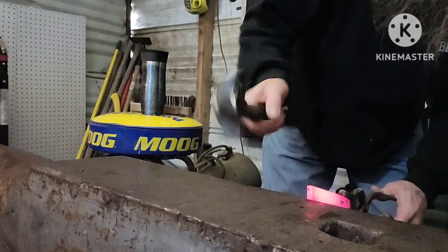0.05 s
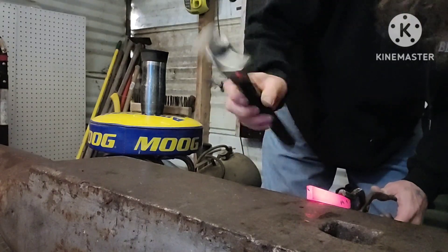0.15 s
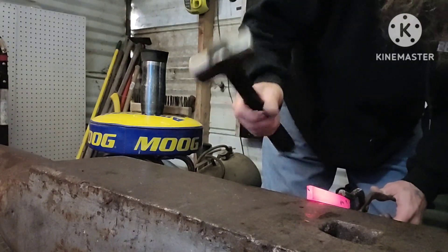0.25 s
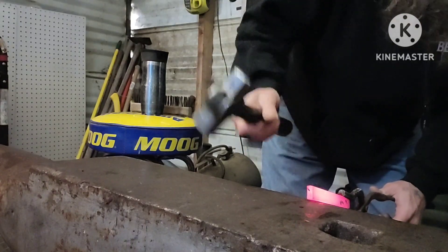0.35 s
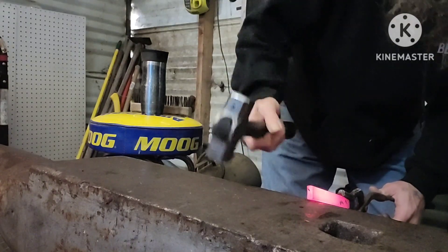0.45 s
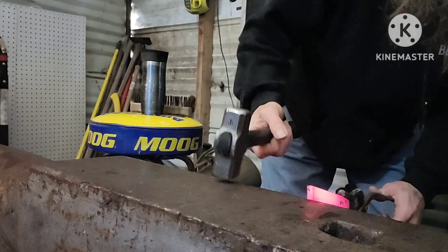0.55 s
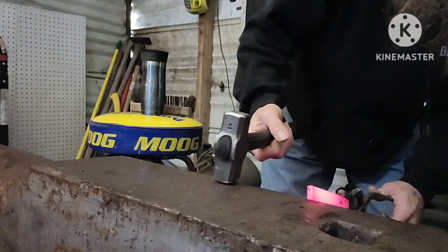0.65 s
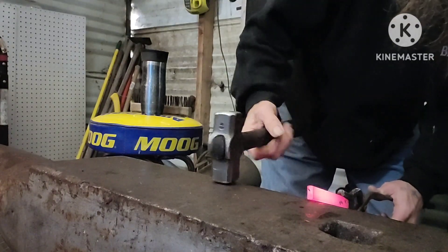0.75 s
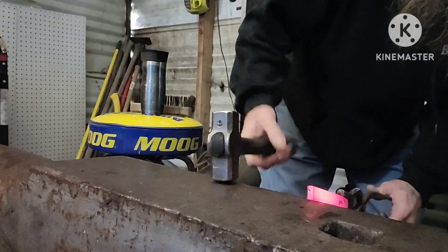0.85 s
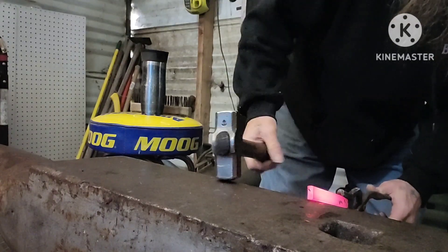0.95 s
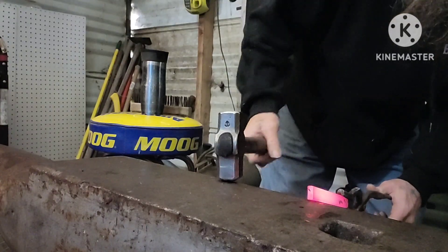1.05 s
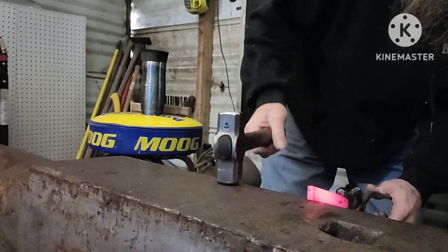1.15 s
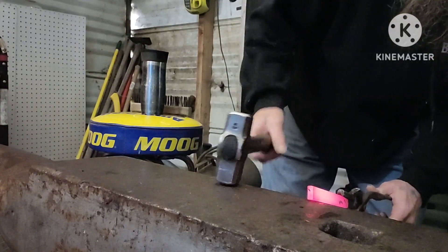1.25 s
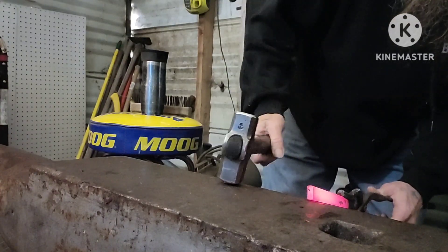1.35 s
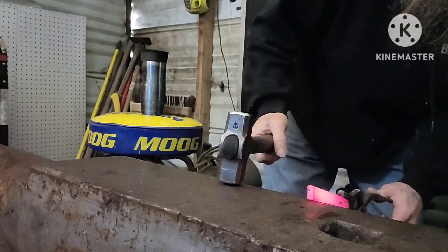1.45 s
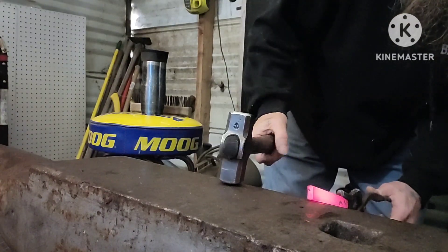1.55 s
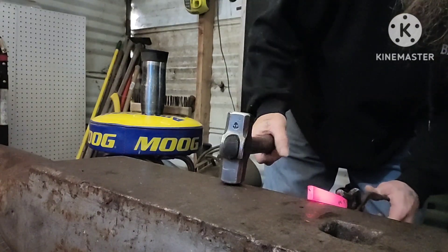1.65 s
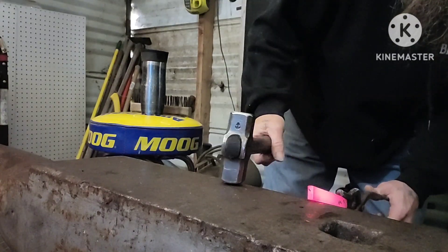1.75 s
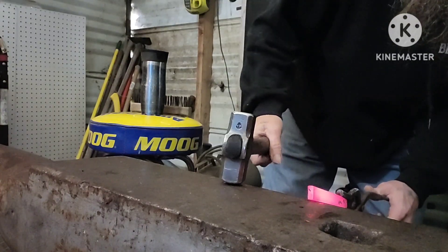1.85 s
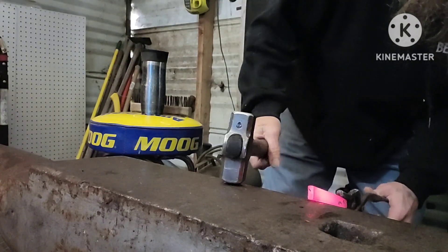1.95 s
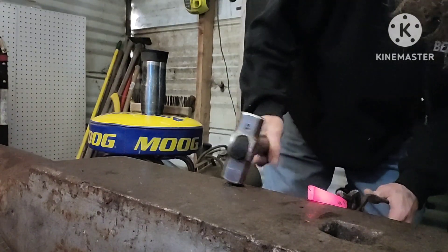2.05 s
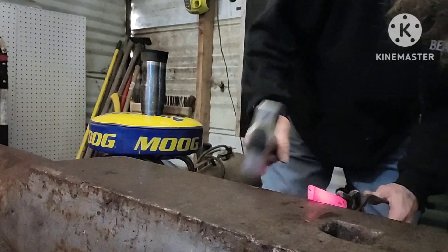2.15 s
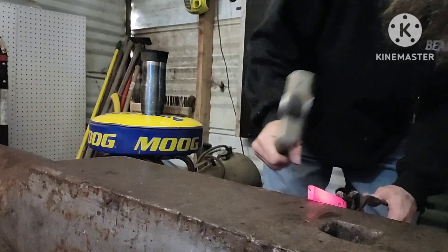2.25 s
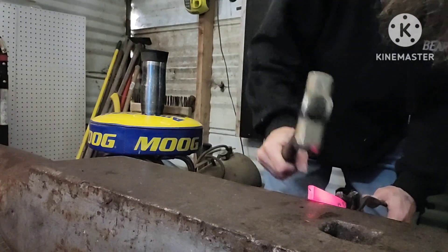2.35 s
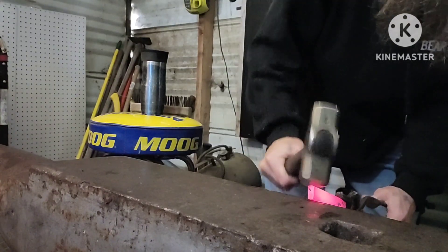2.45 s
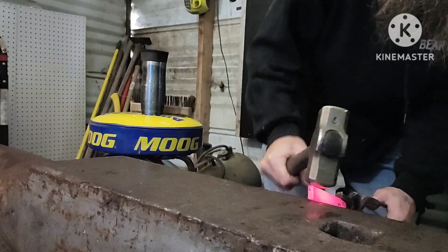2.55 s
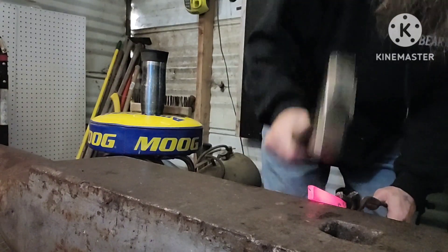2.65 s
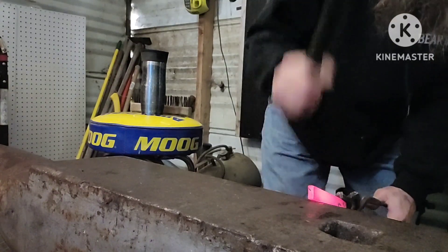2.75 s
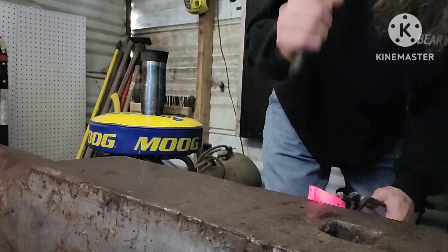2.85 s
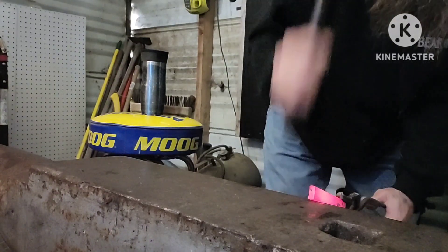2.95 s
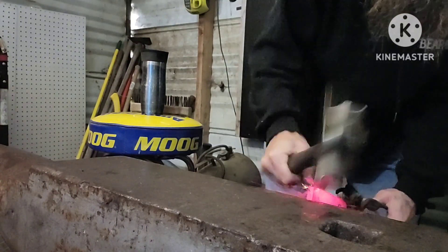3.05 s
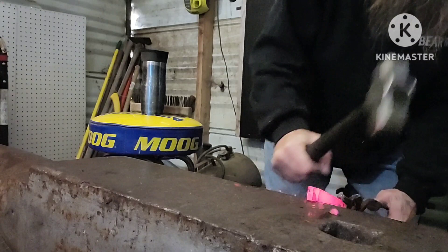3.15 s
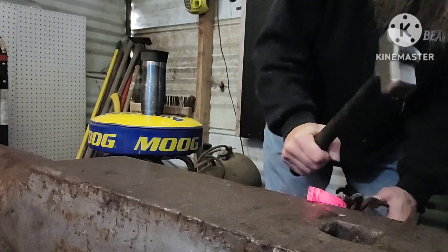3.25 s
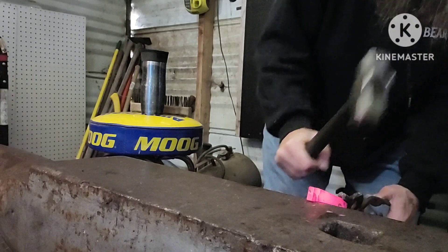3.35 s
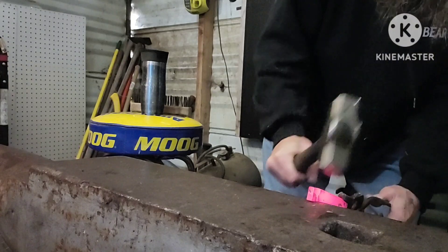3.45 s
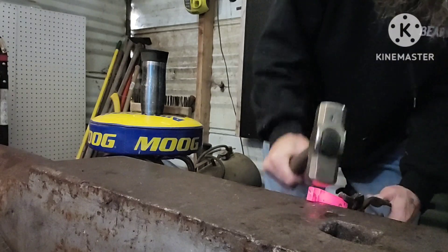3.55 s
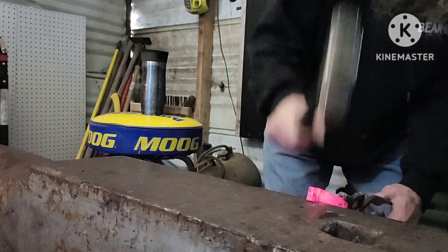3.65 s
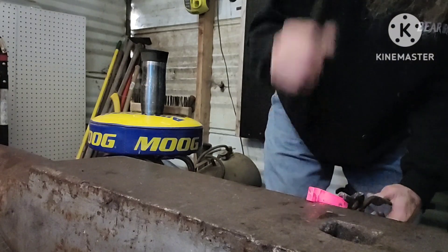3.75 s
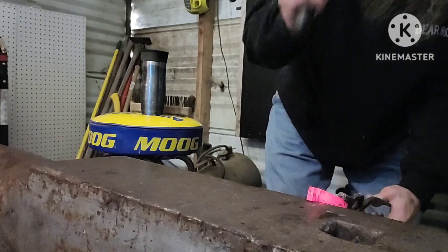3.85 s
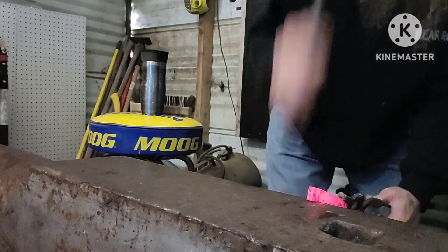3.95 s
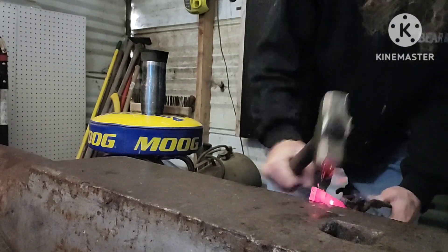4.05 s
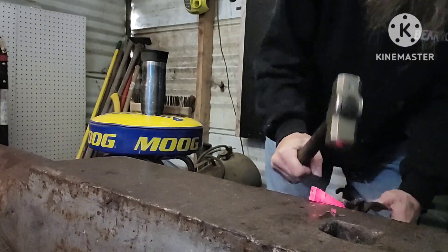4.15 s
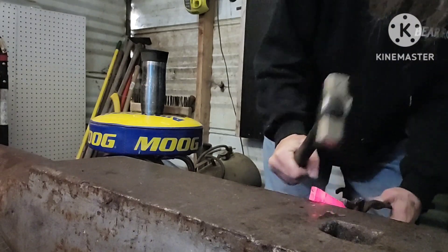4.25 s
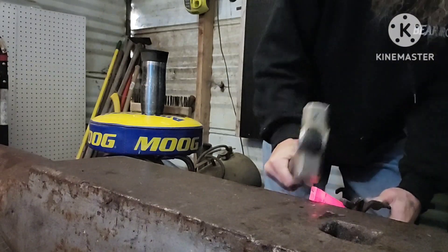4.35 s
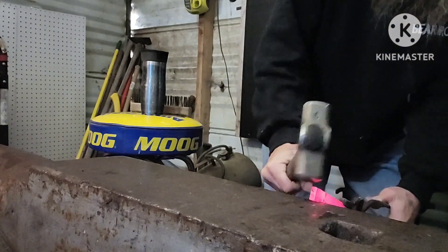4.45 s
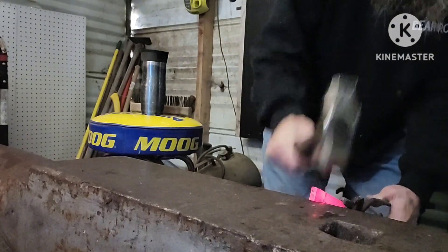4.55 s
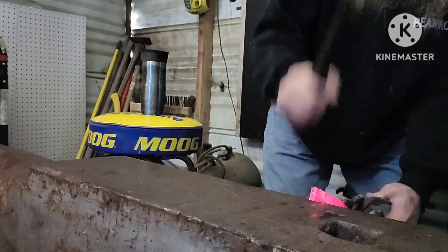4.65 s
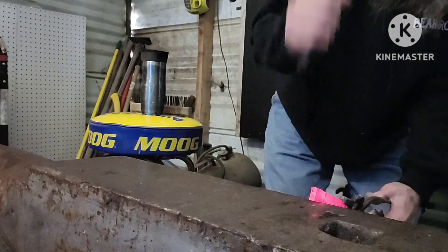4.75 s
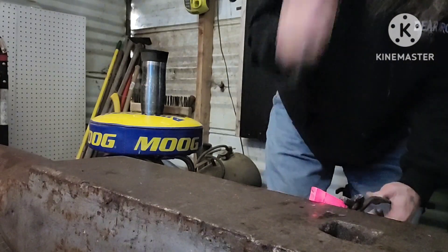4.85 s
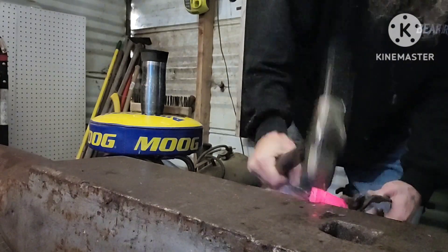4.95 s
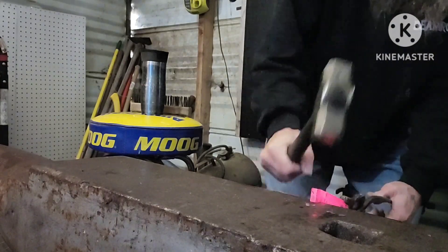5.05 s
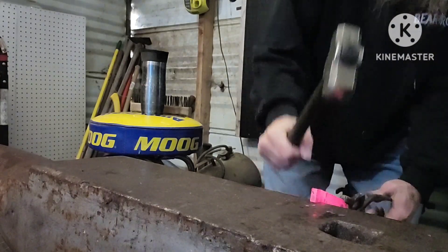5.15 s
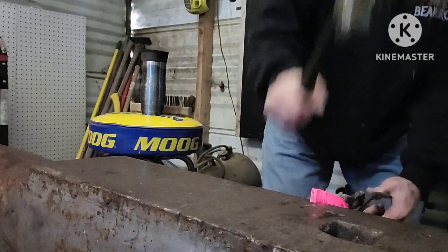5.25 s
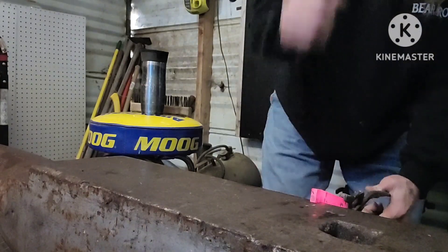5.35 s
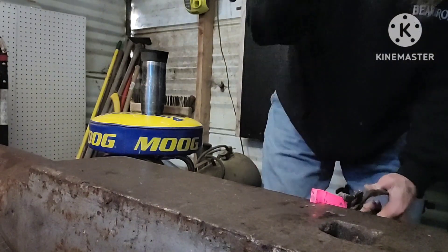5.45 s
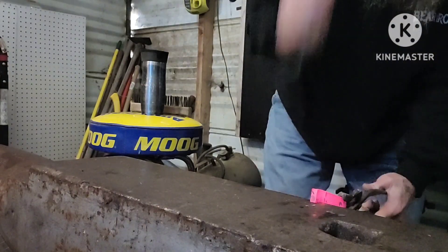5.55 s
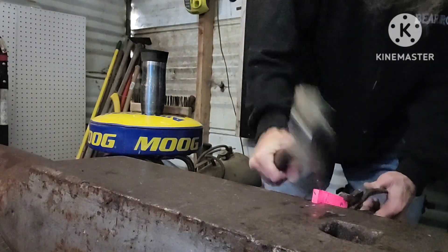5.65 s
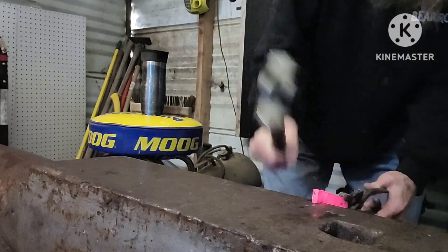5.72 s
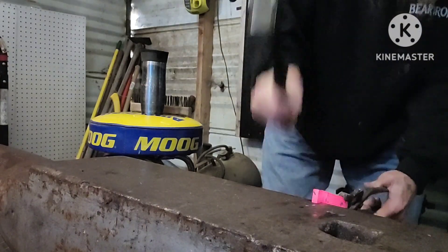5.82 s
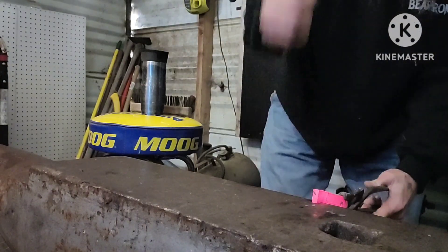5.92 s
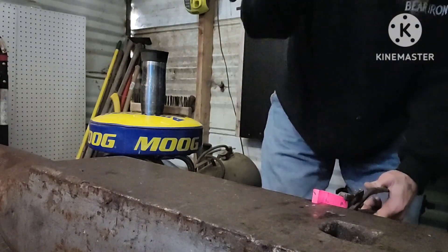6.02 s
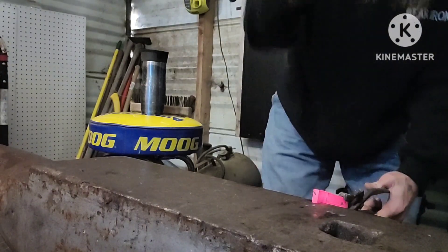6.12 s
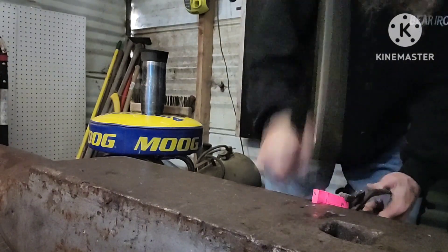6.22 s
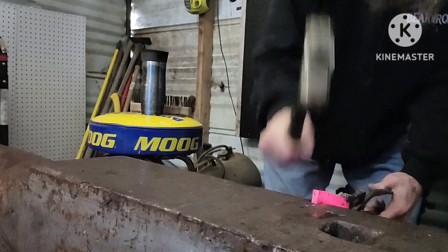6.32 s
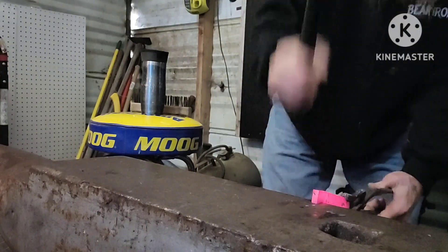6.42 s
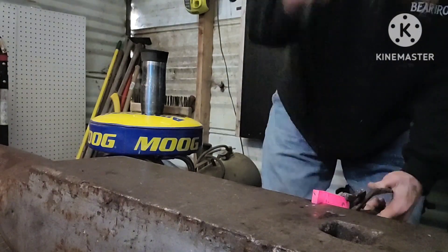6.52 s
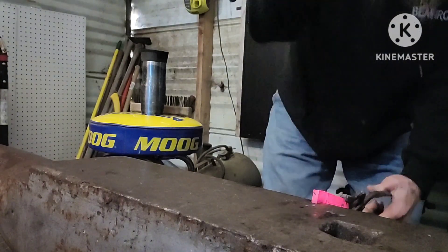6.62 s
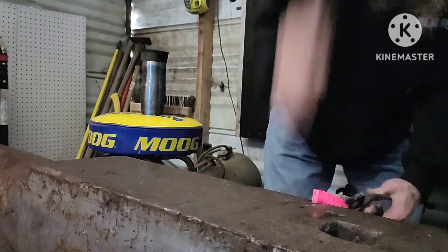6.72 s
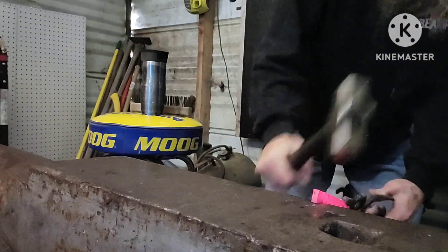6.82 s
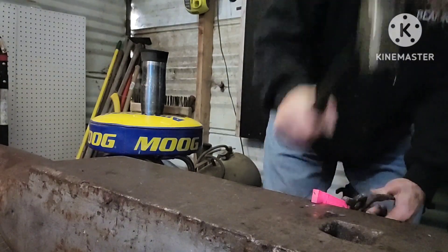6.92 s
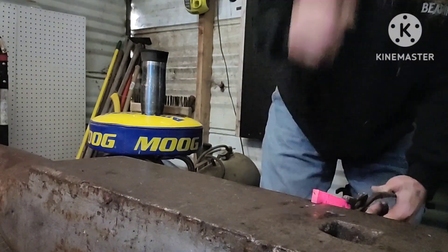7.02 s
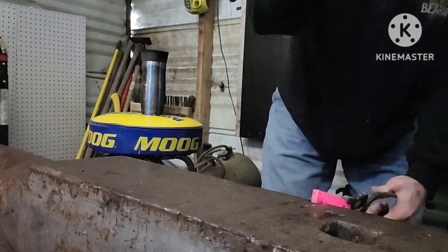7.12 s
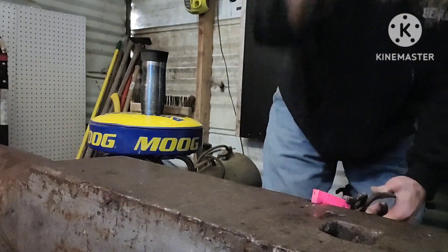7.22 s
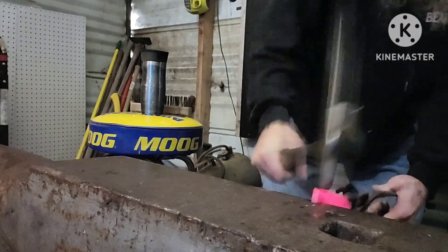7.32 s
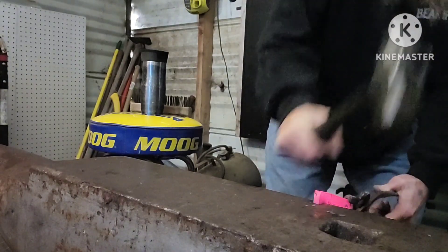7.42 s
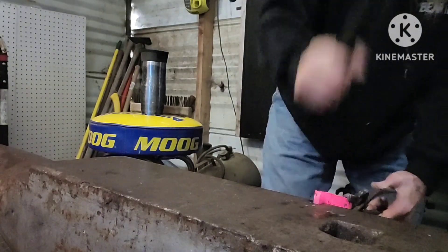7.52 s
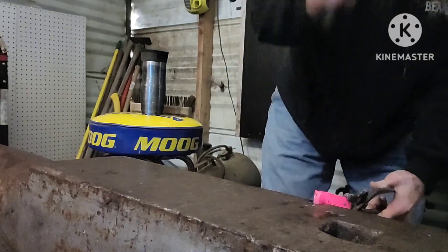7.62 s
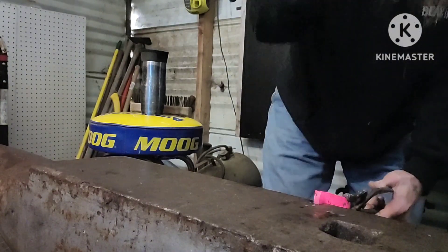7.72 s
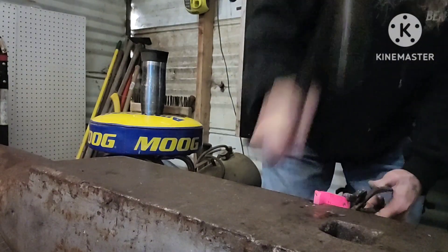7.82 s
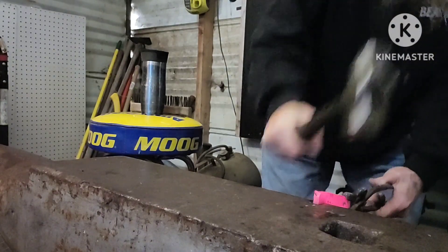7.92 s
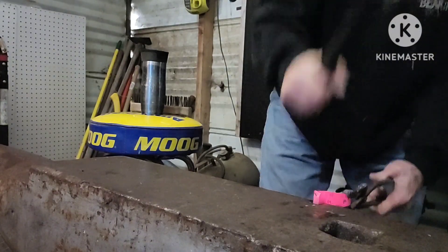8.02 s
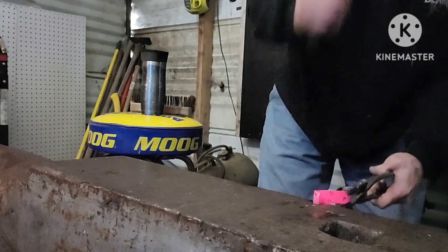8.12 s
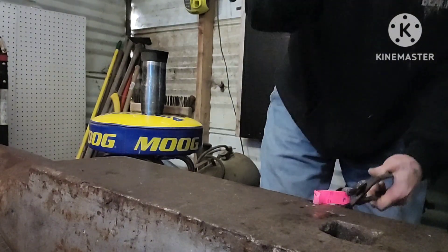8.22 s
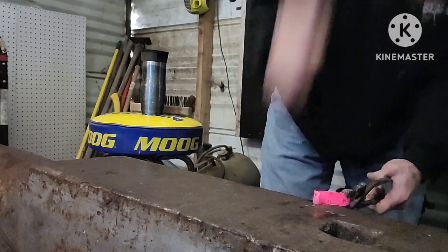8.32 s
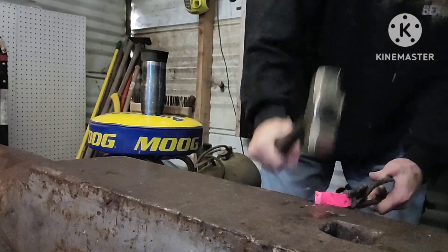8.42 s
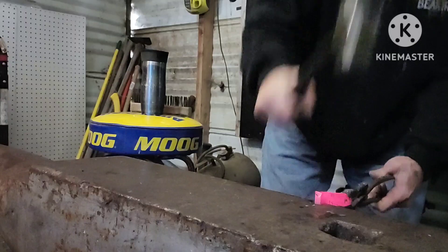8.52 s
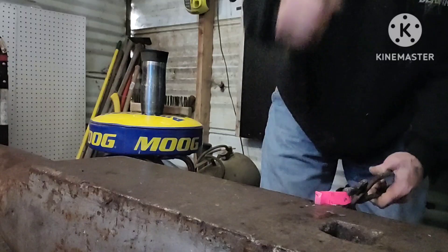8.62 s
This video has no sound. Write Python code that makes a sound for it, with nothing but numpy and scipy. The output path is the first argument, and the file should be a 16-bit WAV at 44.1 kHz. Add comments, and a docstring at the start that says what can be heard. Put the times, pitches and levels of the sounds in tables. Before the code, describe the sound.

In a small shed, a soft airy hiss and low rumble run alone for about two and a half seconds, then a faint metallic tap. Nine hard hammer blows on a hot bar over an anvil follow, about a second apart at first, then roughly every half second. Each is a sharp crack with a brief steely ring and low thump. Close stereo pickup, short wall reflections.

```python
"""In a small shed, before two microphones, a smith flattens a glowing bar on an anvil: nine blows, four light taps.
Each blow is a short swell, a noise crack and crush coloured by damped steel modes, then tones and wall reflections.
Low sines make the thump of the anvil stand; a tap is the same contact, quieter and recoloured, plus one clear ping.
Behind it lie a soft hiss of shaped noise that swells and sinks, a faint steady fizz and a low rumble."""
import sys
import numpy as np
from scipy import signal
from scipy.fft import rfft, irfft, next_fast_len
from scipy.io import wavfile

SR = 44100
rng = np.random.default_rng(int(sys.argv[2]) if len(sys.argv) > 2 else 0)


def unload_wav(signal):
    """Save mono or channel-first audio to the path in sys.argv[1] as 16-bit WAV at rate SR, clipped to [-1, 1]."""
    wavfile.write(
        sys.argv[1],
        SR,
        np.round(np.clip(np.atleast_2d(signal).T, -1, 1) * 32767).astype(np.int16),
    )


N = 382788
LIFE = SR // 2  # samples that one hit lasts

# Hammer on the hot bar. Each row: start in seconds, clank level in dB, then knock, body, ting and sizzle
# (low to high bands of the clank) in dB, thump level in dB, snap in dB (counted twice in the crush),
# left over right in dB, lead-in swell in dB, dip of the hiss after the blow in dB (negative: a rise).
HAMMER_BLOWS = [(3.1017, -18.5, 1.5, 3.5, 1.5, -2, -31.5, 6.5, 0, -4, 1),
                (4.077, -18, 0.5, 4, 3.5, 2, -33.5, 5.5, -0.5, -2, 5),
                (5.0038, -18.5, -4.5, 0, -3, -5.5, -36, 5.5, -1.5, -0.5, 1.5),
                (5.6933, -21, -8, -2, -1.5, -2.5, -35.5, 0, -1.5, 6.5, 3),
                (6.288, -20.5, -9, -5, -3.5, -13, -36.5, 1, -.5, 3.5, -0.5),
                (6.83, -22, -4, -0.8, -0.5, 2.5, -38, -2.5, -1.5, 2, 2.5),
                (7.3721, -19, -4, 0, -1.5, -2, -36, 8, -1.5, -6.5, 2.5),
                (7.8983, -21, -4, -5.5, -1.5, -5.5, -36.5, 4.5, -2.5, 4, 3),
                (8.433, -19.5, -7.5, -4, -1.5, -4.5, -37, 4.5, -.5, 1.5, 2)]


def blows(swell_db=-1, swell_t60=0.052):
    """Each blow excites the steel differently: fuller or thinner, with more or less ting and sizzle."""
    out = np.zeros((2, N))
    lead = SR // 25
    before_crack = np.arange(lead)[::-1] / SR  # seconds left until the crack
    for (s, clank_db, knock_db, body_db, ting_db, sizzle_db,
         thump_db, snap_db, pan_db, rise_db, _) in HAMMER_BLOWS:
        shade = [(350, knock_db), (600, body_db), (1300, body_db), (1800, 0), (3000, 0),
                 (4200, ting_db), (8000, ting_db), (13000, sizzle_db / 2)]  # Hz, dB
        metal = steel()
        colour = lambda hz: metal(hz) * amp(along(shade, hz))

        # the sound swells in over the last few milliseconds before the crack
        lead_in = [(200, 16.4), (1000, 2.3), (2200, 11.6), (15000, 6.5)]  # Hz, dB
        lead_colour = lambda hz: colour(hz) * amp(along(lead_in, hz))
        swell = unit(filtered(diffuse(lead), lead_colour)) * amp([[2], [-2]])
        swell = swell * amp(swell_db + rise_db - 60 * before_crack / swell_t60)

        gain = amp(clank_db + np.array([[pan_db], [-pan_db]]) / 2)
        add(out, s - lead / SR, gain * swell)
        add(out, s, gain * contact(colour, snap_db, sizzle_db))
        add(out, s, amp(thump_db) * stand())

    # left over right (Hz, dB): the body of the clank leans right, the sizzle left
    lean_points = [(100, -0.5), (600, -0.5), (1200, -2.0), (2300, 1.5), (4500, -2.5), (9000, 4), (14000, 2.0)]
    lean = lambda hz: along(lean_points, hz)
    return filtered(out, lambda hz: amp(np.array([lean(hz), -lean(hz)]) / 2))


def contact(colour, snap_db, sizzle_db, crush_db=-10, crush_t60=0.13, build=0.0061, chime_db=-7):
    """A sharp crack and the crush of metal and scale, then the ringing steel and the walls' answer."""
    t = np.arange(LIFE) / SR
    crack_db, crack_t60 = -5.5, .0025
    crush_db = crush_db + 2 * snap_db
    crack = amp(crack_db) * burst(diffuse(LIFE) * amp(-60 * t / crack_t60))
    crush = amp(crush_db) * burst(diffuse(LIFE) * amp(-60 * t / crush_t60))

    # the highest tones reach the microphone mostly by the direct path
    aim = [(200, -3), (1000, -3), (4000, 2), (9000, -3), (15000, 6 + sizzle_db)]  # Hz, dB
    direct = burst(rung(crack + crush, lambda hz: colour(hz) * amp(along(aim, hz))))
    strength = np.hypot(amp(crack_db), amp(crush_db))

    duller = lambda hz: colour(hz) * amp(along([(13000, 0), (14800, -3)], hz))
    tail = burst(shed(duller)) + amp(chime_db) * chime(duller)
    tail = tail * (1 - np.exp(-t / build))  # the answer builds up over milliseconds
    return burst(strength * direct + burst(tail))


# Broad colour of a hard blow. Each row: frequency in Hz, level in dB.
STEEL_COLOUR = [(30, -6), (150, -9.5), (330, -5.5), (480, -6), (850, -6), (1150, 1), (1600, -5.5),
                (2300, -5), (3400, -8.5), (4500, -8), (6500, -7), (8700, -18), (12000, -16), (15200, -12)]
# Modes of anvil, hammer and tongs. Each row: frequency in Hz, width in Hz,
# height in dB against the broad colour (added to it as power).
STEEL_MODES = [(199, 11, 8.5), (275, 8, 7), (527, 30, 3), (564, 14, 9), (683, 10, 12), (735, 33, 4),
               (970, 10, 10), (1110, 17, 2), (1146, 30, 10), (1203, 16, 8), (1268, 14, 8), (2002, 44, 10),
               (2068, 11, 9), (2215, 43, 10), (2347, 34, 6), (2539, 18, 6), (2755, 63, 7), (2870, 65, 2),
               (2970, 67, 4), (3292, 7, 3), (3737, 7, 7), (3876, 36, 11), (4255, 78, 7), (5022, 22, 12),
               (8123, 10, 7), (9660, 97, 6), (10835, 36, 9), (14860, 68, 13)]


def steel(scatter_db=1.5):
    """Colour of one blow: damped modes on a broad base, in a mix that varies at random from blow to blow."""
    hz = np.fft.rfftfreq(LIFE, 1 / SR)
    centre, width, db = np.transpose(STEEL_MODES)[:, :, None]
    height = amp(db + scatter_db * rng.standard_normal(db.shape))
    peaks = np.sum(height ** 2 / (1 + (2 * (hz - centre) / width) ** 2), axis=0)
    gain = amp(along(STEEL_COLOUR, hz)) * np.sqrt(1 + peaks)
    return lambda f: np.interp(f, hz, gain)


def chime(colour, ring_t60=0.11, scatter_db=3, drift=0.0066):
    """The steel's modes ring on as clear tones at uneven strengths, and the highest die first."""
    t = np.arange(LIFE * 2 // 3) / SR
    hz = np.array(STEEL_MODES)[:, :1] * (1 + drift * rng.standard_normal((len(STEEL_MODES), 1)))
    size = colour(hz) * amp(scatter_db * rng.standard_normal(hz.shape))
    fade = amp(-60 * t * (1 + hz / 40000) / ring_t60)
    # long waves reach both microphones nearly in step
    apart = np.minimum(hz / 1300, np.pi) * rng.standard_normal((2, len(hz), 1))
    phase = rng.uniform(0, 2 * np.pi, hz.shape) + apart
    tones = np.sum(size * fade * np.sin(2 * np.pi * hz * t + phase), axis=1)
    return burst(np.pad(tones, [(0, 0), (0, LIFE - len(t))]))


# Echo of the shed. Each row: frequency in Hz, time to fall 60 dB in seconds.
SHED_DECAY = [(80, 1), (250, 0.26), (600, 0.23), (1200, 0.24), (2600, 0.29), (6000, 0.25), (15000, 0.29)]


def shed(colour):
    """Dense reflections of a coloured sound; each frequency dies at its own speed."""
    hz, t, z = signal.stft(filtered(diffuse(LIFE), colour), SR, nperseg=256)
    fade = amp(-60 * t / along(SHED_DECAY, hz)[:, None])
    return signal.istft(z * fade, SR, nperseg=256)[1][:, :LIFE]


# Stand and floor. Each row: frequency in Hz, level in dB, time to fall 60 dB in seconds.
STAND_MODES = [(62, -19, .8), (77.5, -4, .6), (84.5, -3, .45), (93, -5, .25), (108, -3.5, .25),
               (120, -1, .22), (134, -2.5, .22)]


def stand(rise=0.011, spread=0.18):
    """The anvil rocks on its stand and shakes the floor; close modes beat into a second throb."""
    t = np.arange(LIFE) / SR
    ring = 0
    for hz, db, t60 in STAND_MODES:
        phase = spread * rng.normal() * np.array([[1], [-1]])
        size = amp(db + rng.normal(0, 1) - 60 * t / t60)
        ring = ring + size * np.sin(2 * np.pi * hz * t + phase)
    return burst(ring * (1 - np.exp(-t / rise))) * amp([[-.8], [.8]])


# The hammer resting or bouncing lightly. Each row: start in seconds, tink level in dB, thump level in dB.
LIGHT_TAPS = [(2.519, -48.5, -48.5), (3.583, -39, -52), (3.597, -50.5, -64), (6.748, -65, -52)]
# Colour of a tap, laid over the colour of the steel. Each row: frequency in Hz, level in dB.
TAP_COLOUR = [(200, -2), (450, 2), (900, -13), (1220, -0.5), (1500, -7), (2200, -15), (2900, -9),
              (4000, -31), (6300, -5), (10000, -15), (15000, -17)]
# the anvil tone that stands out in a light tap; its level is against the tink
PING_HZ, PING_T60, PING_DB = 1187, 0.14, -7


def taps():
    """A light contact: a recoloured clank, one decaying anvil tone and a faint thump of the stand."""
    out = np.zeros((2, N))
    t = np.arange(LIFE) / SR
    ping = amp(PING_DB) * burst(np.sin(2 * np.pi * PING_HZ * t) * amp(-60 * t / PING_T60))
    for s, tink_db, thump_db in LIGHT_TAPS:
        metal = steel()
        colour = lambda hz: metal(hz) * amp(along(TAP_COLOUR, hz))
        tink = contact(colour, snap_db=12.0, sizzle_db=-4)
        add(out, s, amp(tink_db) * (tink + ping))
        add(out, s, amp(thump_db) * stand())
    return out


# Colour of the hiss. Each row: frequency in Hz, level in dB.
HISS_COLOUR = [(100, -14), (280, -4), (700, 0), (1500, -.5), (3000, -1), (5600, -4), (7100, -8),
               (8300, -18), (12000, -17), (15500, -15.5)]
# Colour of the rumble. Each row: frequency in Hz, level in dB.
RUMBLE_COLOUR = [(20, -15), (40, -8), (76, 0), (105, -5), (135, -6), (165, -13), (200, -9), (400, -22),
                 (1000, -45)]
FIZZ_DB, FIZZ_HZ = -63.5, 7000  # a faint steady treble under the hiss: level, lower edge
RUMBLE_DB, RUMBLE_FOLLOWS = -56.5, 0.23  # mean level of the rumble; its dB for each dB of the hiss


def background(hiss_db=3):
    """Shaped noise: a soft hiss and a steady fizz over the shed's low rumble, which rises a little with the hiss."""
    hiss = unit(filtered(diffuse(N), lambda hz: amp(along(HISS_COLOUR, hz))))
    fizz = unit(filtered(diffuse(N), lambda hz: hz > FIZZ_HZ))
    rumble = unit(filtered(diffuse(N), lambda hz: amp(along(RUMBLE_COLOUR, hz))))
    db = hiss_level()
    rumble_db = RUMBLE_DB + RUMBLE_FOLLOWS * (db - db.mean())
    return hiss * amp(db + hiss_db) + fizz * amp(FIZZ_DB) + rumble * amp(rumble_db)


# Slow course of the hiss. Each row: time in seconds, level in dB before the lift in background().
HISS_COURSE = [(0.0, -48.5), (2.03, -40.5), (6.21, -51.5), (7.69, -48.5), (8.68, -54)]
# Brief swells of the hiss. Each row: time of the top in seconds, rise in dB,
# seconds from the top until the rise has shrunk to 1/e.
HISS_SWELLS = [(0.248, 4, 0.043), (.61, 5, 0.099), (4.734, 4.5, .04), (5.26, 3.5, 0.11), (5.58, 2.5, 0.083),
               (7.72, 2, 0.14), (8.343, 4, .025)]
DIP_FALL_S, DIP_RECOVER_S = 0.2, 0.51  # after most blows the hiss sinks, then comes back


def hiss_level():
    """The slow level in dB, with dips after the blows and a few brief swells."""
    t = np.arange(N) / SR
    dip_times = [0, DIP_FALL_S, DIP_FALL_S + DIP_RECOVER_S]
    dips = sum(np.interp(t - s, dip_times, [0, dip_db, 0]) for s, *_, dip_db in HAMMER_BLOWS)
    swells = sum(rise_db * np.exp(-((t - s) / half) ** 2) for s, rise_db, half in HISS_SWELLS)
    return level(HISS_COURSE) - dips + swells


# Likeness of the two microphones. Each row: frequency in Hz, left-right correlation from 0 to 1.
STEREO_LIKENESS = [(60, 0.92), (130, 0.9), (290, 0.91), (640, 0.24), (1400, 0.03), (15000, 0)]


def diffuse(size):
    """Stereo noise: alike in the bass, unrelated in the treble."""
    turn = lambda hz: np.arccos(np.clip(along(STEREO_LIKENESS, hz), -1, 1)) / 2
    shares = lambda hz: np.array([np.cos(turn(hz)), np.sin(turn(hz))])
    mid, side = filtered(rng.standard_normal((2, size)), shares)
    return np.array([mid + side, mid - side])


def amp(db):
    """Decibels to gain."""
    return 10 ** (np.asarray(db) / 20)


def unit(x):
    """Scale to rms 1."""
    return x / np.sqrt(np.mean(x ** 2) + 1e-20)


def burst(x):
    """Scale a hit to the energy of a tenth of a second at rms 1."""
    return x / np.sqrt(np.mean(np.sum(x ** 2, axis=-1)) * 10 / SR + 1e-20)


def along(points, hz):
    """Read (Hz, value) points on a log frequency axis."""
    f, v = np.transpose(points)
    return np.interp(np.log(hz + 1), np.log(f + 1), v)


def level(rows):
    """Level in dB per sample from (seconds, dB) rows."""
    return np.interp(np.arange(N) / SR, *np.transpose(rows))


def filtered(x, gain):
    """Zero-phase colour."""
    m = next_fast_len(x.shape[-1] + 8192)
    return irfft(rfft(x, m) * gain(np.fft.rfftfreq(m, 1 / SR)), m)[..., :x.shape[-1]]


def rung(x, gain):
    """Causal (minimum-phase) colour: resonances ring on after the push."""
    m = 2 * next_fast_len(x.shape[-1])
    cepstrum = irfft(np.log(np.maximum(gain(np.fft.rfftfreq(m, 1 / SR)), 1e-6)))
    # fold the cepstrum onto positive time
    cepstrum[1:m // 2] *= 2
    cepstrum[m // 2 + 1:] = 0
    return irfft(rfft(x, m) * np.exp(rfft(cepstrum)), m)[..., :x.shape[-1]]


def add(track, s, sound):
    """Mix a sound in at s seconds, cut at the end of the track."""
    room = track[:, round(s * SR):][:, :sound.shape[-1]]
    room += sound[..., :room.shape[-1]]


def scene():
    """Blows and taps stand out from the quiet of the forge."""
    return blows() + taps() + background()


def record(dry, ceiling=1.0, top_hz=15650):
    """The loudest cracks are rounded off, and a steep filter removes what lies above the band limit."""
    rounded = dry / (1 + np.abs(dry / ceiling) ** 4) ** (1 / 4)
    return filtered(rounded, lambda hz: 1 / (1 + (hz / top_hz) ** 120))


dry = scene()
out = record(dry)
unload_wav(out)
```